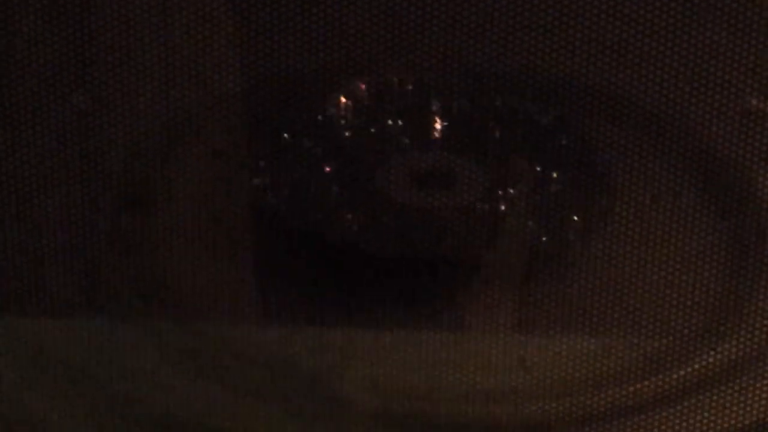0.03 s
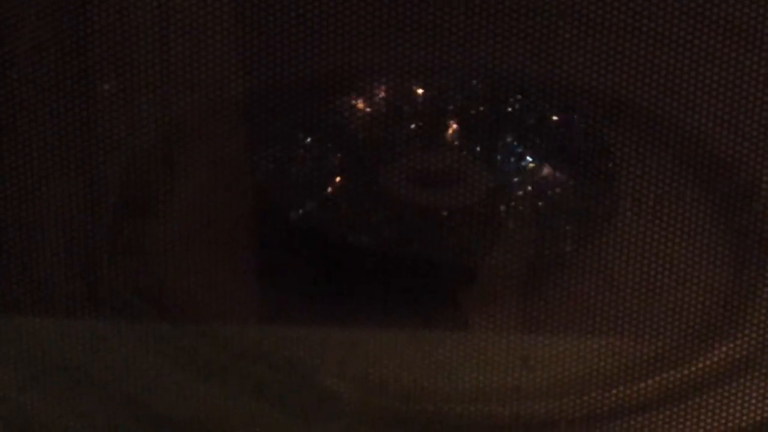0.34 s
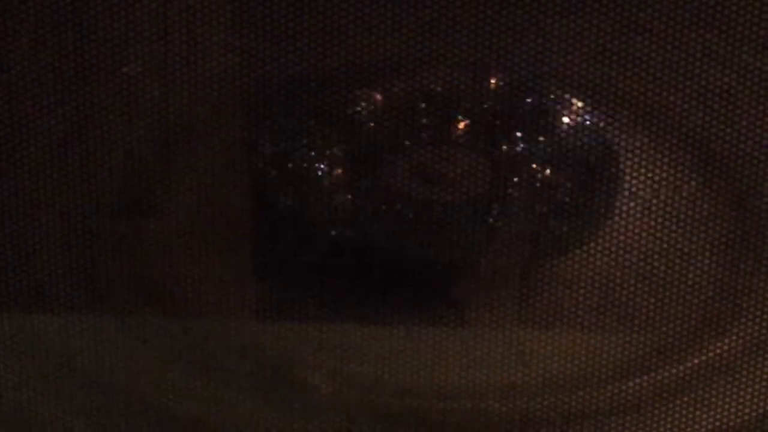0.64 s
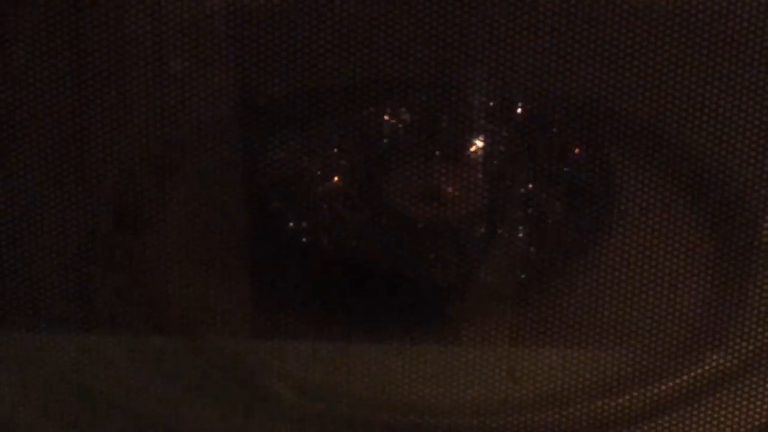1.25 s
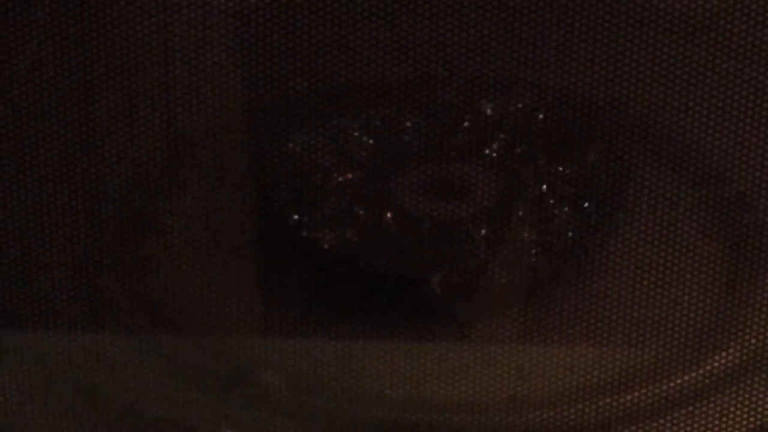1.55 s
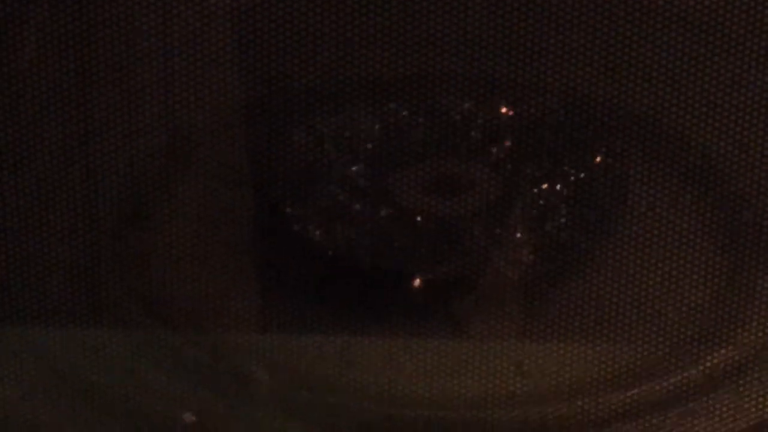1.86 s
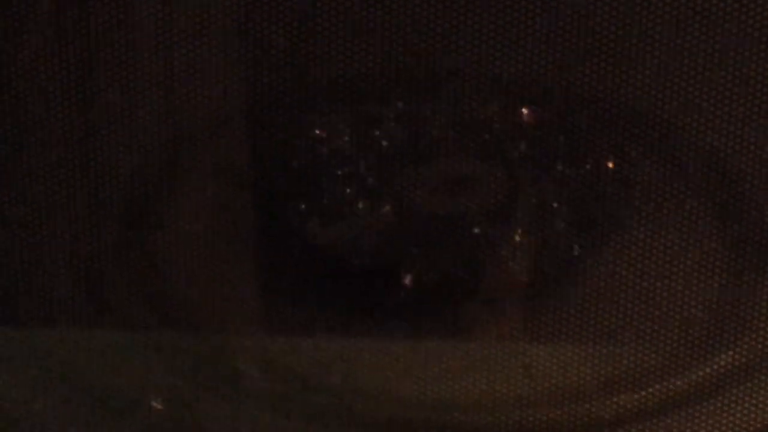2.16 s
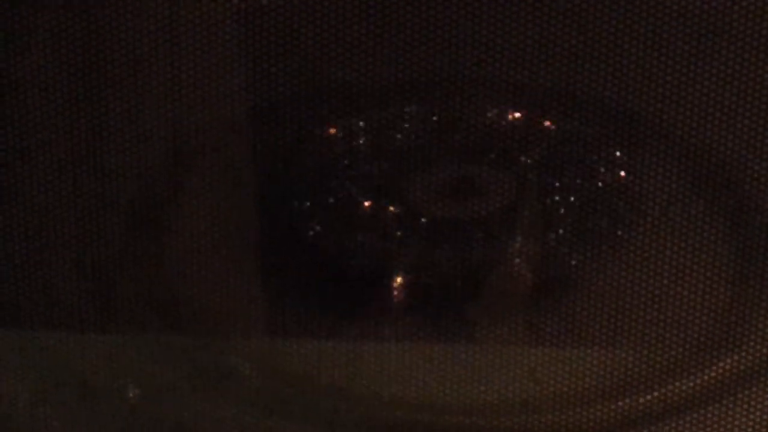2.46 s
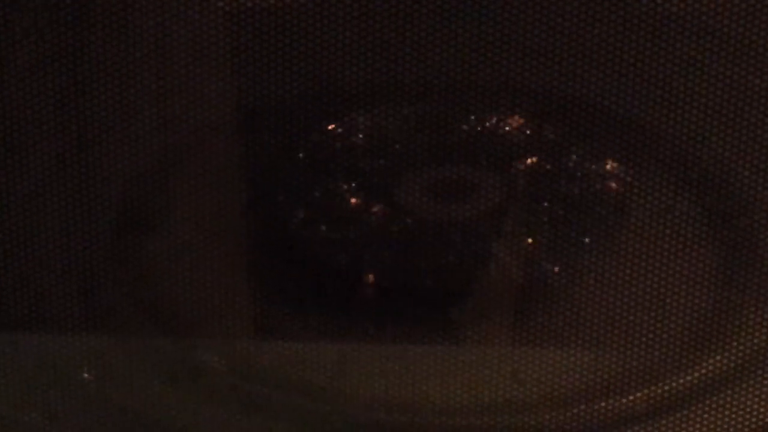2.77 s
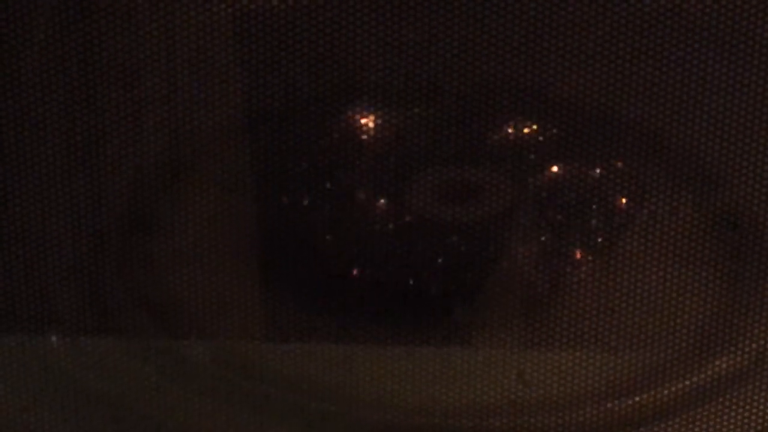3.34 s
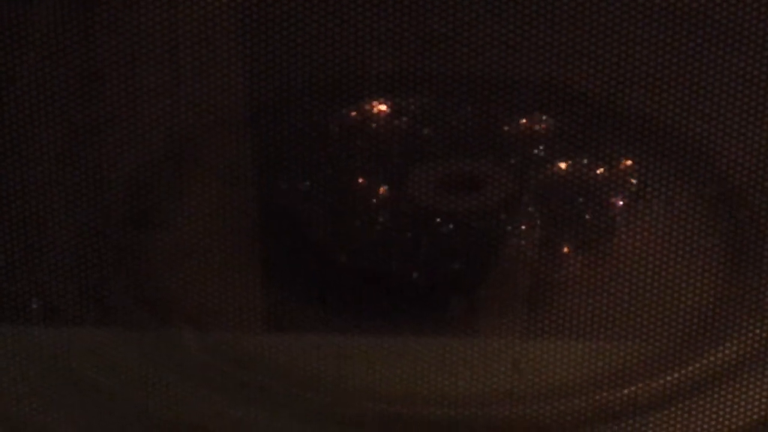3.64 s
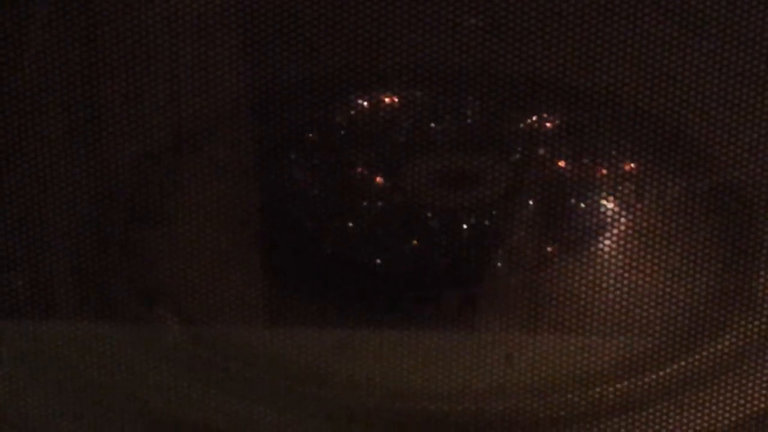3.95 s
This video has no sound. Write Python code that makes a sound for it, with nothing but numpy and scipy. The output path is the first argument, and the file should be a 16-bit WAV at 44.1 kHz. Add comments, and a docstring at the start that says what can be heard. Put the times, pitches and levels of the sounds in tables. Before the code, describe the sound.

Electrical zaps crackle from a disc arcing inside a microwave oven, heard just outside the door. A steady low hum, fan rush and faint high fizz run throughout. Sharp snaps with a brief metallic ring start at 0.2 seconds, peak around 0.6 to 0.8 seconds and thin out by 1.6. Small zaps return near 2.4 seconds and from 3 seconds until the end at 4.

```python
"""A disc arcs inside a running microwave oven, heard from just outside the door. From the start the cooling fan
blows and the transformer hums under a faint fizz of tiny sparks. Almost at once, big zaps jump the cracking
foil on the peaks of the mains cycle and ring the steel cavity. They hit hardest between 0.6 and 0.8 s and thin
out by 1.6 s, leaving fan, hum and fizz; a few small zaps return toward the end."""
import sys
import numpy as np
from scipy import signal
from scipy.fft import rfft, irfft
from scipy.io import wavfile

SR = 44100
rng = np.random.default_rng(int(sys.argv[2]) if len(sys.argv) > 2 else 0)


def int16_out(signal):
    """Quantize to a 16-bit WAV file."""
    q = np.round(np.clip(np.atleast_2d(signal).T, -1, 1) * 32767)
    wavfile.write(sys.argv[1], SR, q.astype(np.int16))


N = 176400
MAINS_HZ, MAINS_PEAK_S = 60.012, .0105  # sparks favour this moment, then the same peak of each cycle

# EQ of the fan's rush: f/Hz, relative level/dB
AIR_EQ = [(12, -21), (35, -10.5), (75, -5), (140, -4.5), (215, 4), (260, 6), (320, -9), (385, -4.5),
          (440, -0.5), (510, -2.5), (630, -4.5), (820, -3.5), (1000, -7), (1110, -9), (1330, -3.5),
          (1560, -3.5), (1850, -8.5), (2050, -6.5), (2330, -15), (2500, -9.5), (2700, -15.5), (3500, -20),
          (5000, -24), (9000, -39), (15000, -60)]
# Pan of the rush: f/Hz, left minus right/dB
AIR_PAN = [(200, 8.5), (600, 5.5), (780, 4), (1000, 2), (1200, -1), (1550, 2.5), (1900, 7.5), (2300, 4.5),
           (2800, 1.5), (5000, 7)]
# Stereo width of the rush: f/Hz, left-right correlation (1 is mono)
AIR_CORRELATION = [(50, 0.97), (130, 0.61), (300, 0.98), (640, 0.86), (1000, -0.021), (1400, -0.23),
                   (2000, 0.085), (3000, 0.26), (5000, -0.4)]
# Whine of the fan motor and panels: f/Hz, level/dB, waver depth (0-1)
FAN_TONES = [(178.1, -44.5, 0.7), (495.3, -54, 0.9), (532.6, -50.5, .6), (678.4, -57, 1), (959, -64, 0.7),
             (1056, -60, 0.6), (1394, -60.5, 0.6), (1508, -57.5, 0.4), (1704, -58.5, .9),
             (1988, -61.5, 0.8)]
# Transformer hum: multiple of the mains, level/dB (once warmed up), waver depth (0-1)
HUM_HARMONICS = [(2, -25.5, 0.06), (3, -56, 0.9), (4, -25, 0), (5, -46.5, 0.57), (7, -55.5, 1),
                 (10, -51.5, 0.3)]
# Swells of two more hum harmonics: t/s, level of the 6th/dB, level of the 8th/dB
HUM_SWELLS = [(0, -47, -56), (.85, -46.5, -53.5), (1.18, -50.5, -40.5), (1.55, -44.5, -48),
              (1.85, -48.5, -42), (2.35, -47.5, -39.5), (2.7, -50, -46), (3.1, -51.5, -44.5),
              (3.5, -52, -46), (4, -54.5, -48.5)]
# Reverb of the steel cavity: f/Hz, time to fall 60 dB/s
CAVITY_DECAY = [(1000, 0.18), (3700, 0.2), (5200, 0.22), (6800, 0.19), (10000, 0.21), (14500, 0.14)]
# EQ of the fizz: f/Hz, relative level/dB
FIZZ_EQ = [(2500, -19), (3600, -4), (4700, -9), (5800, 2.5), (6900, 4), (7800, -2.5), (9200, -13),
           (11000, -26), (12500, -26), (14500, -32)]
# Pan of the fizz: f/Hz, left minus right/dB
FIZZ_PAN = [(3600, -3.5), (4500, -11.5), (6500, 0), (8100, -3.5), (10500, -27), (14500, -14.5)]
# Cue list of the main zaps: t/s, relative level/dB, extra treble/dB, extra body/dB, extra bite/dB
ZAP_CUES = [(.176, -24.5, -2.5, -10, 0.5), (.185, -35, -8, 0, -10), (.291, -45, 0, 0, 2),
            (.3082, -30, -10, -5, 0), (.3247, -32, -3, 3.5, -3), (.358, -33.5, -5, 7, 3),
            (0.3749, -35.5, 2, 0, 7), (.392, -32, 3.5, 0, 11.5), (0.4753, -25.5, -0.5, -5, 8),
            (.4925, -28, -2, 3.5, -12), (.509, -27.5, 2, -2, 5), (.526, -30.5, -2, -7, 0),
            (0.542, -32.5, -1, 10.5, 0), (0.5598, -25.5, 1, -4, 1), (0.575, -21.5, -8, -5, 4),
            (0.592, -25, 0, 4, -7), (0.6116, -22, -2, -1, -1), (0.6754, -18.5, 0, -5, 7.5),
            (0.7761, -20, 0.5, -9, 3.5), (.793, -23.5, 1, -6, 4), (.809, -18.5, -4, -3, 0),
            (.826, -27.5, -5, 0, -1), (.877, -34, -1, 4, 5), (.8939, -29.5, 0, 0, 2),
            (0.925, -39.5, 6, 7, 13.5), (0.976, -42, 4, -2, 5), (0.9908, -38, 0, 0, 7),
            (1.0081, -29.5, -2, 2, -12), (1.025, -32.5, -5, 0, -3), (1.076, -41, 3, 0, 0),
            (1.1094, -36, 2, 3, 7), (1.192, -47, -5, 0, 3), (1.2595, -39.5, 0, -2, 5),
            (1.309, -41.5, -3, 0, 7), (1.325, -35, -4, 0, 0), (1.3936, -36.5, -1, 1, 0),
            (1.408, -36.5, -4, 0, 0), (1.459, -29.5, -8, 4, 2), (1.5766, -41, -7, -2, 4),
            (2.392, -42.5, -2, 0, 0), (2.41, -48, 4, 0, -9), (3.025, -43.5, -5, -6, -2),
            (3.15, -54, 2, 2, -2), (3.3792, -53, 9, 2, 0), (3.492, -54, 5, 0, 0), (3.592, -52, 2, 0, 0),
            (3.708, -43, 4, 0, -5), (3.7744, -37.5, 4, -3, -5)]
# Density of the weak stray arcs: t/s, chance per mains cycle (0-1)
STRAY_CHANCE = [(0, .4), (.9, .9), (1.45, .7), (1.7, .04), (2.8, .05), (3.1, .35), (4, .4)]
# EQ of a zap through the door: f/Hz, relative level/dB
ZAP_EQ = [(200, -42), (900, -5.5), (1700, -5), (2400, -4.5), (3380, -7), (3620, -0.5), (3900, -3.5),
          (4200, -4.5), (4700, -4), (5600, 0), (6600, 6.5), (7500, 4), (8200, -2), (9300, -4),
          (11500, -7.5), (14500, -5.5)]
# Pan of the zaps: f/Hz, left minus right/dB
ZAP_PAN = [(1000, 1.5), (2500, -2.5), (3600, 1.5), (4400, -8.5), (5800, 6), (6700, -3), (7700, -3),
           (10000, -8.5), (14500, -13)]


def amp(db):
    return 10 ** (np.asarray(db) / 20)


def unit_rms(x):
    return x / np.sqrt(np.mean(x ** 2) + 1e-20)


def curve_at(points, hz):
    """Reads a table on a log-frequency axis."""
    f, value = np.transpose(points)
    return np.interp(np.log(hz + 1), np.log(f + 1), value)


def add(mix, start_s, sound):
    """Drops a stereo sound into the mix."""
    part = mix[:, round(start_s * SR):][:, :sound.shape[1]]
    part += sound[:, :part.shape[1]]


def eq_and_pan(x, eq, pan):
    """Shapes and places a stereo pair; minimum phase, so nothing rings ahead of a click."""
    hz = abs(np.fft.fftfreq(2 * N, 1 / SR))
    log_gain = np.log(amp(curve_at(eq, hz) + np.outer([.5, -.5], curve_at(pan, hz))))
    response = np.exp(np.conj(signal.hilbert(log_gain)))[:, :N + 1]
    return irfft(rfft(x, 2 * N) * response)[:, :N] / np.sqrt(np.mean(abs(response) ** 2))


def drift(rate_hz):
    """A slow random modulator, complex, with a spread of 1."""
    hz = np.fft.fftfreq(N, 1 / SR)
    wander = np.fft.ifft(np.exp(2j * np.pi * rng.random(N)) / (1 + (hz / rate_hz) ** 2))
    return wander / np.std(wander)


def tone(hz, db, waver, rate_hz, crest_s=0):
    """A sine that wavers in level and phase."""
    carrier = np.exp(2j * np.pi * hz * (np.arange(N) / SR - crest_s))
    return amp(db) * unit_rms(((1 + waver * drift(rate_hz)) * carrier).real)


def fan(air_db=-37):
    """The bed: air rushes through the vents, motor and panels whine faintly, the shaft throbs."""
    correlation = np.clip(curve_at(AIR_CORRELATION, np.fft.rfftfreq(N, 1 / SR)), -1, 1)
    left, independent = rfft(rng.standard_normal((2, N)))
    right = correlation * left + np.sqrt(1 - correlation ** 2) * independent
    air = eq_and_pan(irfft(np.array([left, right]), N), AIR_EQ, AIR_PAN)
    gusts_db = .5 * drift(rate_hz=1.7).real
    whine = sum(tone(hz, db, waver, rate_hz=5.9) for hz, db, waver in FAN_TONES)
    shaft = tone(hz=58.87, db=-40, waver=.12, rate_hz=2.6)
    return amp(air_db + gusts_db) * unit_rms(air) + whine + shaft


def transformer(warmup_db=-2, warmup_s=.68):
    """The hum: the core flexes as its flux crests, a quarter cycle from the mains peak."""
    t = np.arange(N) / SR
    flux_s = MAINS_PEAK_S - 1 / (4 * MAINS_HZ)
    harmonics = {k: tone(k * MAINS_HZ, db, waver, rate_hz=1.9, crest_s=flux_s)
                 for k, db, waver in HUM_HARMONICS}
    harmonics[4] *= amp(warmup_db * np.exp(-t / warmup_s))
    times, *levels = np.transpose(HUM_SWELLS)
    for k, db in zip((6, 8), levels):
        swell = amp(np.interp(t, times, db))
        harmonics[k] = swell * tone(k * MAINS_HZ, db=0, waver=.72, rate_hz=6.8, crest_s=flux_s)
    return sum(harmonics.values())


def cavity():
    """Dense echoes of the steel box from one spot on the disc, dying away band by band."""
    hz, t, bands = signal.stft(rng.standard_normal((2, SR // 3)), SR, nperseg=256)
    decay = amp(-60 * t / curve_at(CAVITY_DECAY, hz)[:, None])
    return signal.istft(bands * decay, SR, nperseg=256)[1]


def fizz(db=-49.5, sparks_per_s=1500, spread_db=1.5, foil_spots=8):
    """Tiny sparks all over the foil bunch up once a mains cycle; each spot has its own echoes."""
    t = np.arange(N + SR) / SR - 1  # 1 s of pre-roll, so the box is already ringing
    field = 1 + np.cos(2 * np.pi * MAINS_HZ * (t - MAINS_PEAK_S))
    size = amp(spread_db * np.minimum(rng.exponential(1, len(t)), 4))
    polarity = rng.choice([-1, 1], len(t))
    sparks = size * polarity * (rng.random(len(t)) < field * sparks_per_s / SR)
    spot = rng.integers(0, foil_spots, len(t))
    ring = sum(signal.oaconvolve(sparks[None] * (spot == k), cavity(), axes=1)
               for k in range(foil_spots))
    return amp(db) * unit_rms(eq_and_pan(ring[:, SR:SR + N], FIZZ_EQ, FIZZ_PAN))


def crack(burn_s=.0097, fade_s=.0039, snaps_per_s=2000, dry_to_wet=.15):
    """One snap and a few milliseconds of sputter; each snap feeds the ringing cavity."""
    echoes = cavity()
    t = np.arange(echoes.shape[1]) / SR
    snaps = rng.standard_normal(len(t)) * (rng.random(len(t)) < snaps_per_s / SR)
    snaps *= np.exp(-t / fade_s) * (t < burn_s)
    snaps[0] = 1.7  # a hard attack ahead of the sputter
    snaps /= np.linalg.norm(snaps)
    direct = dry_to_wet * np.linalg.norm(echoes[0]) * snaps
    return direct + echoes * np.sqrt(np.cumsum(snaps ** 2))


def zap(db, treble_db, body_db=0, bite_db=0):
    """One arc's crack, voiced; bite is a band near 4 kHz that clean, sharp arcs carry more of than sputtering
    ones."""
    body_hz, bite_hz, bite_width_hz, treble_hz = 3230, 3950, 370, 8400
    hit = crack()
    hz = np.fft.rfftfreq(SR // 2, 1 / SR)
    treble = 1 / (1 + (treble_hz / (hz + 1)) ** 6)  # high shelf
    body = (1 - np.tanh((hz - body_hz) / 100)) / 2  # low shelf
    bite = (1 - body) / (1 + ((hz - bite_hz) / bite_width_hz) ** 2)
    gain = amp(db + treble_db * treble + body_db * body + bite_db * bite)
    return irfft(rfft(hit, SR // 2) * gain, SR // 2)[:, :hit.shape[1]]


def arcs(stray_db=-55.5, spread_db=2):
    """The lead: cued zaps jump the cracking foil, and weak strays fire at random on mains peaks."""
    mix = np.zeros((2, N))
    for start_s, *voicing in ZAP_CUES:
        add(mix, start_s, zap(*voicing))
    peaks = np.arange(MAINS_PEAK_S, N / SR, 1 / MAINS_HZ)
    for start_s, roll, size in zip(peaks, rng.random(len(peaks)), rng.standard_normal(len(peaks))):
        stray = zap(stray_db + spread_db * min(size, 2), treble_db=-3)
        if roll < np.interp(start_s, *np.transpose(STRAY_CHANCE)):
            add(mix, start_s, stray)
    return eq_and_pan(mix, ZAP_EQ, ZAP_PAN)


def scene(hum_lag_s=.00006, hum_right_db=.25):
    """Fan and hum under fizz and zaps; the hum lands a touch later and louder on the right."""
    t = np.arange(N) / SR
    hum_left = transformer()
    hum_right = amp(hum_right_db) * np.interp(t - hum_lag_s, t, hum_left)
    return fan() + np.array([hum_left, hum_right]) + fizz() + arcs()


def record(dry, cutoff_hz=14750):
    """A steep low-pass trims the very top of the mix."""
    lowpass = signal.firwin(401, cutoff_hz, window=("kaiser", 8), fs=SR)
    return signal.oaconvolve(dry, lowpass[None], "same")


dry = scene()
out = record(dry)
int16_out(out)
```